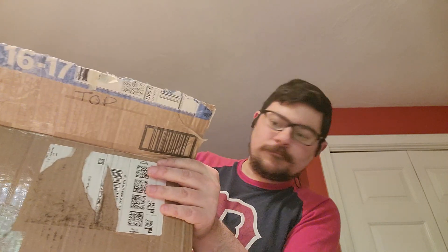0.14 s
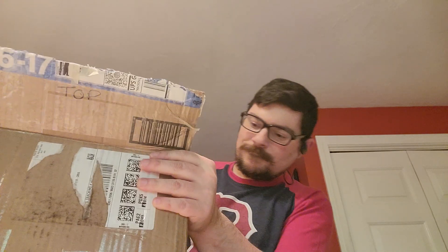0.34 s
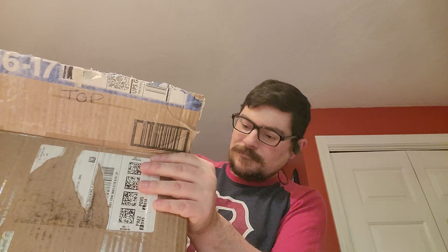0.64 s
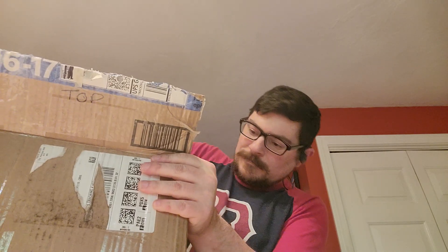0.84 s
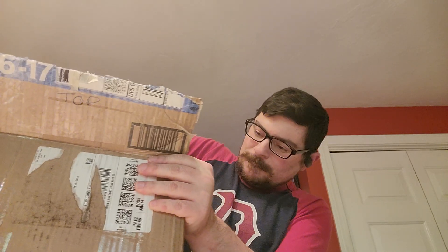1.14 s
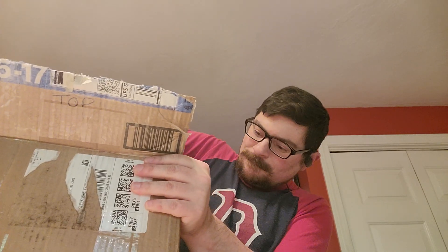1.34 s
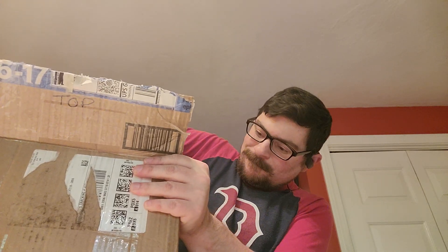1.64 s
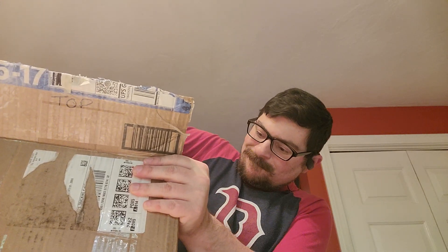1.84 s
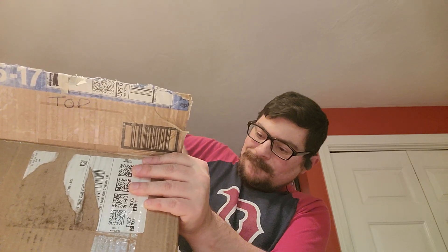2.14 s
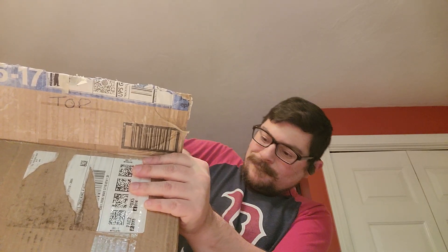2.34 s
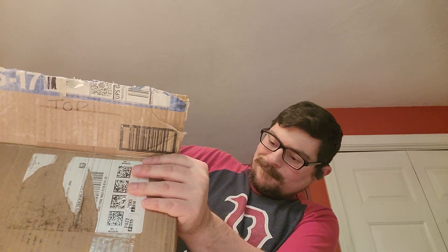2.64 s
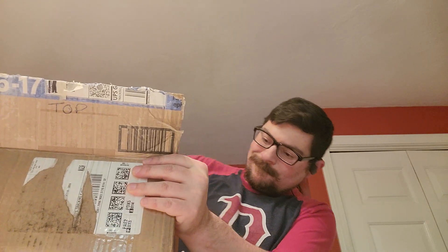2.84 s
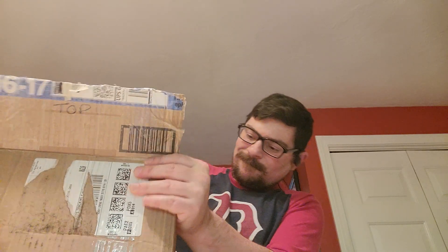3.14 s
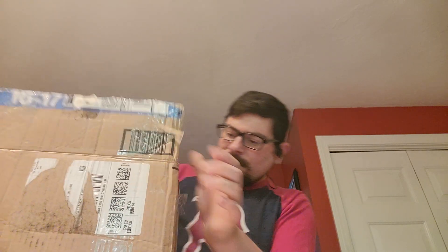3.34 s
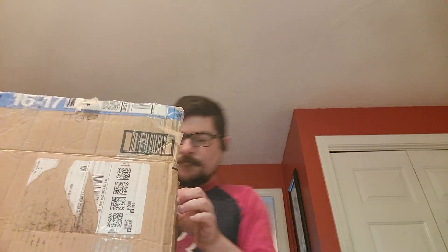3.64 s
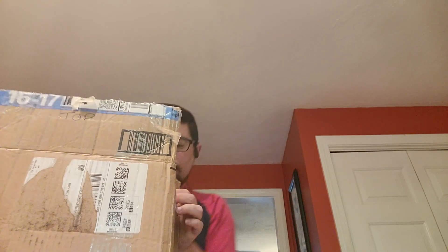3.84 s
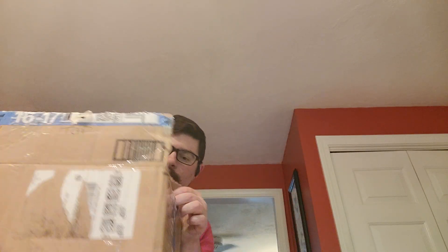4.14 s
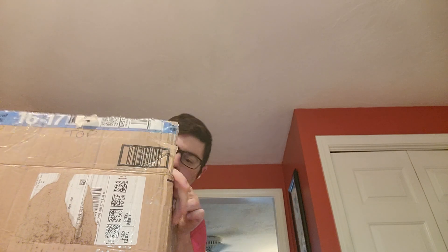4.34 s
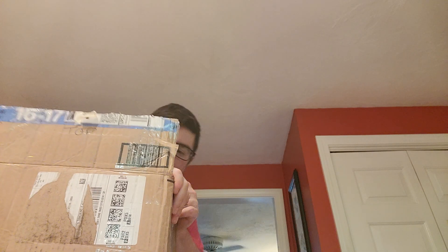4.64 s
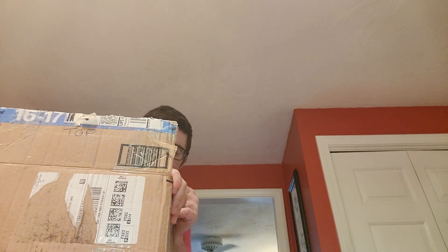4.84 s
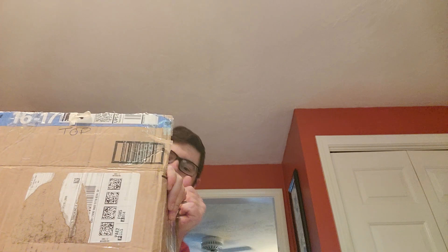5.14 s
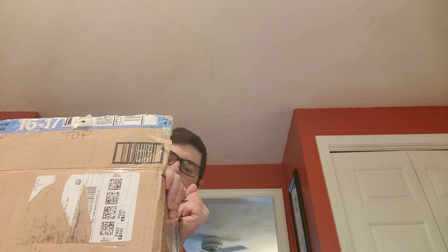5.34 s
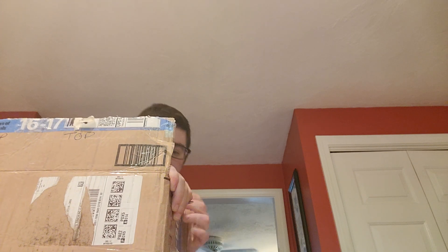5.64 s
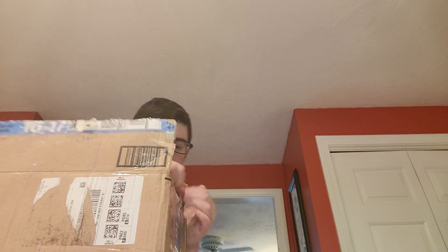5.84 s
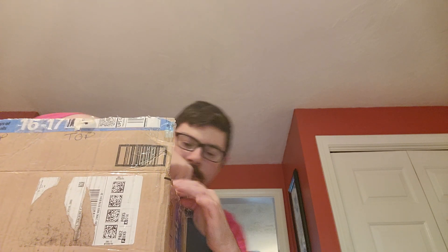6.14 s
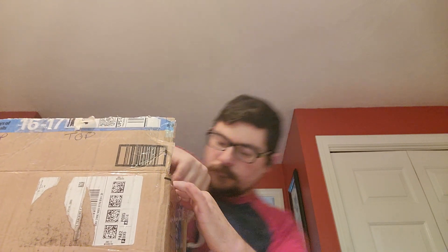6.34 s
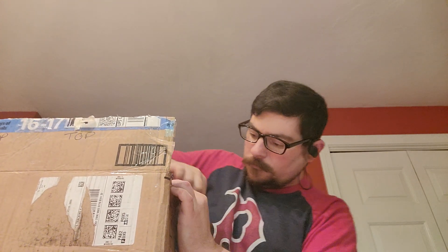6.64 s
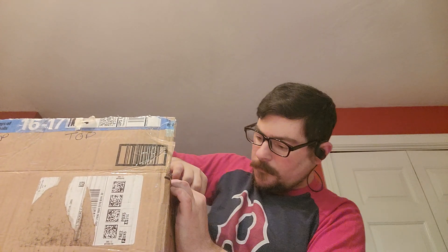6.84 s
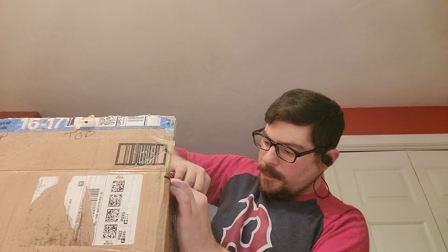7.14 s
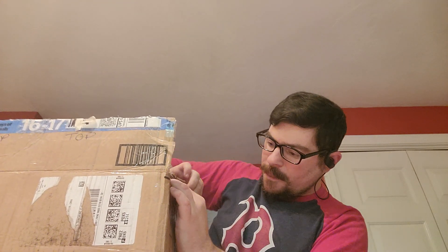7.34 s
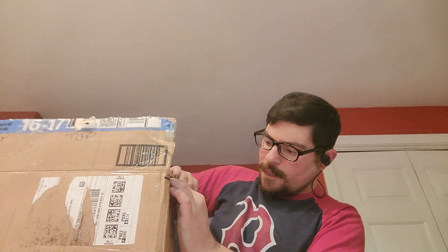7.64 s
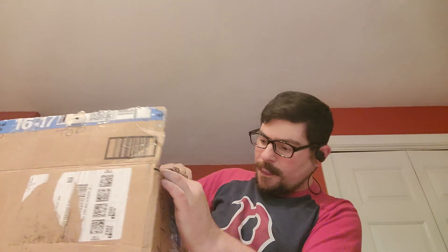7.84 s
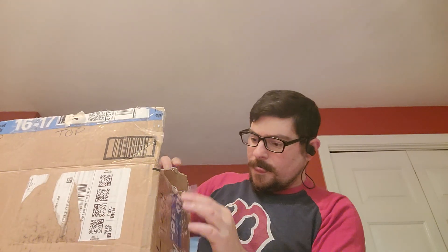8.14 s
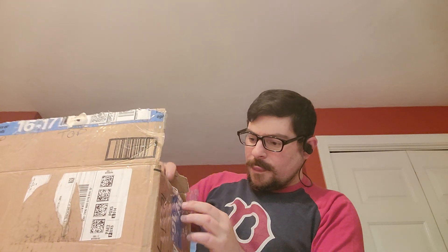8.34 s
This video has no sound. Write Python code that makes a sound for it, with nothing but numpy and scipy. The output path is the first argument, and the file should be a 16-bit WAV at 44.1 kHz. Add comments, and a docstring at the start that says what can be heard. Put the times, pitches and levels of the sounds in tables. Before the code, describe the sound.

Fingers rub and pick at a big hollow cardboard box in a small bare room, with juddering scrapes, crinkly tape snaps and a late sharp rip.

```python
"""Fingers pick and tear packing tape off a big cardboard box, close to a phone in a small, bare room.
Film snaps are short noise bursts, taut tape pings are sinking tones, and glue lets go in runs of grains.
Knocked or buckled panels are damped oscillators that excite the modes of the hollow box.
Between them hands rub the cardboard by stick-slip: filtered grains of noise under each stroke.
The walls answer all the handling with a bright, diffuse tail; indoor air rumbles faintly below."""
import sys
import numpy as np
from scipy import signal
from scipy.fft import rfft, irfft, next_fast_len
from scipy.io import wavfile
from scipy.ndimage import uniform_filter1d

SR = 44100
rng = np.random.default_rng(int(sys.argv[2]) if len(sys.argv) > 2 else 0)


def log_audio(samples):
    """Write samples as a 16-bit WAV file to the path given in sys.argv[1]."""
    # one column per channel
    frames = np.atleast_2d(samples).T
    # limit to full scale, then quantise
    limited = np.clip(frames, -1, 1)
    pcm = np.round(limited * 32767).astype(np.int16)
    wavfile.write(sys.argv[1], SR, pcm)


N = 374850
TIME = np.arange(N) / SR  # s
TOP_HZ = 15800  # upper edge of the phone's band


def undb(db):
    """Level: decibels to amplitude gain."""
    return 10 ** (np.asarray(db) / 20)


def unit(x):
    """Normalization: scale to rms 1."""
    return x / np.sqrt(np.mean(x ** 2) + 1e-18)


def along(points, hz, axis=1):
    """Interpolation: read a table column on a log-frequency axis."""
    points = np.array(points)
    return np.interp(np.log(hz + 1), np.log(points[:, 0]), points[:, axis])


def colour(x, points, tilt_db=0, size=2048):
    """Minimum-phase filtering: a causal response of unit energy with a given spectrum, tilted per octave."""
    hz = np.fft.rfftfreq(size, 1 / SR)
    level_db = along(points, hz) + tilt_db * np.log2(1 + hz / 1000)
    cepstrum = irfft(np.log(undb(level_db)))
    # Folding the cepstrum onto positive times makes the response causal.
    cepstrum[size // 2:] = 0
    cepstrum[1:] *= 2
    response = irfft(np.exp(rfft(cepstrum)))
    response = response[None] / np.linalg.norm(response)
    return signal.fftconvolve(x, response, axes=1)[:, :x.shape[1]]


def add(out, s, x):
    """Superposition: mix a sound in at time s."""
    i = max(int(s * SR), 0)
    out[:, i:i + x.shape[-1]] += x[..., :N - i]


def fade(t, t60):
    """Exponential damping: the amplitude falls 60 dB in t60 seconds."""
    return np.exp(-np.log(1000) * t / max(t60, 1e-4))


def ports(x, likeness):
    """Interaural coherence: two unrelated signals become a partly alike left and right."""
    c = np.clip(likeness, 0, 1)
    common = np.sqrt(1 + c) * x[0]
    opposed = np.sqrt(1 - c) * np.array([x[1], -x[1]])
    return (common + opposed) / np.sqrt(2)


def uneven_sizes(shape, spread_db):
    """Log-normal statistics: amplitudes scatter about 1 in decibels, clipped at two spreads."""
    return undb(spread_db * np.clip(rng.standard_normal(shape), -2, 2))


def grains(n, rate, spread_db, t60, likeness):
    """Shot noise: random tiny slips of uneven size, each a short puff of noise; rate is per second."""
    hits = (rng.random(n) < rate / SR) * uneven_sizes(n, spread_db)
    power = signal.lfilter([1], [1, -fade(1 / SR, t60) ** 2], hits ** 2)
    return unit(np.sqrt(power) * ports(rng.standard_normal((2, n)), likeness))


def indoor_air(level_db=-55.5):
    """Broadband ambient noise: steady noise concentrated in the bass."""
    # spectrum of the air rumble: frequency_hz, level_db
    air_spectrum = [(25, -3), (80, 0), (277, 1), (516, -8), (818, -34), (911, -20.5), (1290, -27.5),
                    (7510, -33), (16000, -55)]
    noise = ports(rng.standard_normal((2, N)), 0.86)
    return undb(level_db) * colour(noise, air_spectrum)


def strokes(swell_share=0.23, release_t60=0.45):
    """Friction follows sliding speed: each stroke gathers speed, holds it and dies away; powers add."""
    # hand strokes: start_s, length_s, panel_drag_db, paper_scrape_db, film_hiss_db
    stroke_rows = [(0, 0.072, -47.5, -58, -61), (0.046, 0.36, -44.5, -55, -50.5),
                   (0.484, 0.11, -55, -57.5, -60), (0.574, 0.09, -39.5, -48, -50.5),
                   (0.856, 0.24, -46, -56, -54), (1.067, 0.45, -43.5, -57.5, -55),
                   (1.486, 0.45, -58, -64, -54), (1.836, 0.32, -46.5, -53, -56),
                   (2.06, 0.22, -45, -59, -58), (2.393, 0.16, -49.5, -52, -49),
                   (2.543, 0.37, -42.5, -65, -64), (2.924, 0.17, -46, -65, -60),
                   (3.144, 0.15, -38, -50, -49.5), (3.533, 0.038, -45, -51.5, -51),
                   (3.615, 0.14, -42.5, -64, -57), (3.69, 0.16, -44.5, -52.5, -52),
                   (3.845, 0.19, -40, -48.5, -50.5), (4.065, 0.16, -43.5, -47.5, -43.5),
                   (4.262, 0.11, -44, -49.5, -47), (4.348, 0.15, -42.5, -50, -59),
                   (4.45, 0.29, -44, -50.5, -56), (4.755, 0.083, -57, -55, -45),
                   (4.896, 0.21, -48, -53.5, -54), (5.15, 0.21, -43, -50.5, -48),
                   (5.427, 0.14, -46, -54, -56), (5.565, 0.071, -40.5, -47, -45),
                   (5.645, 0.22, -42, -47.5, -49), (5.997, 0.041, -52, -58.5, -51.5),
                   (6.282, 0.2, -50.5, -59, -57), (6.594, 0.19, -50, -58.5, -54),
                   (7.09, 0.14, -54, -68.5, -61), (7.258, 0.11, -49.5, -58.5, -48),
                   (7.372, 0.065, -39, -58, -39), (7.602, 0.31, -44.5, -52.5, -47),
                   (7.984, 0.074, -48, -49.5, -55), (8.356, 0.027, -56.5, -70, -71),
                   (8.435, 0.065, -49, -52.5, -50.5)]
    # the hands holding the box never lie quite still: panel_drag_db, paper_scrape_db, film_hiss_db
    holding_db = (-53.5, -81.5, -70)
    power, t = np.zeros((3, N)), TIME[:SR]
    for s, length, *levels_db in stroke_rows:
        swell = np.minimum(t / (swell_share * length), 1)
        speed = swell * fade(np.maximum(t - length, 0), release_t60)
        add(power, s, np.outer(undb(levels_db), speed) ** 2)
    return np.sqrt(power + undb(holding_db)[:, None] ** 2)


def waver(per_s):
    """Slow random modulation: levels held briefly and smoothed, of rms 1."""
    k = int(SR / per_s)
    held = np.repeat(rng.standard_normal(N // 100), k)[:N]
    return unit(uniform_filter1d(held, k))


def crackles(rate=6, spread_db=9.5, cycles=6, order=12):
    """Impulse response: fibres and creases give way, each with a damped tick at one of twelve pitches."""
    out, t = np.zeros((2, N)), TIME[:SR // 50]
    for hz in np.geomspace(700, 5000, order):
        hits = (rng.random(N) < rate / SR) * uneven_sizes((2, N), spread_db)
        tick = np.sin(2 * np.pi * hz * t) * fade(t, cycles / hz)
        out += signal.oaconvolve(hits, tick[None], axes=1)[:, :N]
    return unit(out)


def rubbing(uneven_db=0.5):
    """Stick-slip friction: panels rumble, paper scrapes and crackles, loose film hisses, at an uneven pace."""
    # spectrum of the panels' rumble: frequency_hz, level_db
    drag_spectrum = [(25, -14.5), (50, 1.5), (75, 0), (130, -2), (300, -1), (530, -5), (800, -14),
                     (1600, -28.5), (5000, -53)]
    # spectrum of the scraped paper: frequency_hz, level_db
    scrape_spectrum = [(300, -16), (800, -1.5), (1400, -1), (2400, -7.5), (3500, -2.5), (5000, -13.5),
                       (9000, -32)]
    # spectrum of the loose film: frequency_hz, level_db
    hiss_spectrum = [(2500, -16), (5000, -8), (7300, -1.5), (9700, -8.5), (13000, -3.5), (16000, -3)]
    drag, scrape, hiss = strokes()
    pace = undb(uneven_db * waver(40))
    slips = grains(N, rate=300, spread_db=3.5, t60=0.068, likeness=1.0)
    fibres = grains(N, rate=760, spread_db=2.5, t60=0.0095, likeness=0.099)
    crinkle = grains(N, rate=660, spread_db=8.5, t60=0.0079, likeness=0.13)
    rumble = undb(-2.0) * drag * colour(slips, drag_spectrum)
    paper = 0.75 * colour(fibres, scrape_spectrum) + 0.85 * crackles()
    film = colour(crinkle, hiss_spectrum)
    return rumble + pace * (undb(-1.5) * scrape * paper + undb(-6.0) * hiss * film)


def peels(rise_s=0.00035, release_t60=0.011, fractures_per_s=350, fractures_at_db=-33):
    """Adhesive fracture: glue strands break in quick uneven runs and shake the stretched film."""
    # stretches of peeling tape: start_s, length_s, relative level_db, brightness_db_per_octave
    peel_rows = [(0.21, 0.044, -34.5, 4.5), (0.927, 0.037, -49, 7.5), (1.519, 0.03, -32, 5.5),
                 (1.631, 0.02, -36, 4), (2.733, 0.011, -31, -0.5), (3.305, 0.036, -41, 0),
                 (4.695, 0.017, -34.5, 0.5), (5.275, 0.03, -38, -4), (5.63, 0.029, -43, 2),
                 (7.405, 0.012, -32.5, -1), (7.497, 0.025, -31, 1.5), (7.522, 0.025, -28.5, 1.5),
                 (7.635, 0.018, -34.5, 4), (7.737, 0.038, -19, 4.5), (7.799, 0.099, -32, 1.5)]
    # spectrum of the stretched film: frequency_hz, level_db
    film_spectrum = [(150, 4), (400, 12.5), (800, 0.5), (1500, 1.5), (2500, -0.5), (4000, 2.5),
                     (7000, -2.5), (9700, -10.5), (12500, -10), (16000, -6.5)]
    out, t = np.zeros((2, N)), TIME[:SR // 4]
    for s, length, db, tilt_db in peel_rows:
        pull = (1 - np.exp(-t / rise_s)) * fade(np.maximum(t - length, 0), release_t60)
        # A harder pull breaks more strands per second.
        rate = fractures_per_s * undb(db - fractures_at_db)
        fractures = grains(len(t), rate=rate, spread_db=4.5, t60=0.003, likeness=0.3)
        add(out, s, undb(db + 1.0) * colour(fractures * pull, film_spectrum, tilt_db))
    return out


def snaps(t60=0.0056, rise_s=0.00043, snap_db=-1, pan_db=0.5):
    """Impulsive release: the film snaps or a nail slips off its edge in a short burst of noise."""
    # snaps: start_s, relative level_db, body_db (low and middle bands), top_db (treble)
    snap_rows = [(0.212, -15, -11, -9), (.378, -20, -0.5, -3), (0.64, -25.5, -9, -8), (.689, -30, 9, 10),
                 (0.9246, -23, -22, -3), (1.211, -30.5, -15, 3), (1.3286, -21, -11.5, -8),
                 (1.5207, -3, 8, 0), (1.5433, -14, -8, -2), (1.642, -10.5, -7, -2.5),
                 (1.8154, -15, -21, -4.5), (1.884, -15, -8.5, -5.5), (1.914, -17, -12, -3),
                 (1.9634, -11, -11, -10), (2.1321, -12.5, -7, -6.5), (2.669, -17.5, -6.5, -5),
                 (2.719, -20, -7, -7), (2.7333, -12.5, -4.5, 1.5), (2.739, -16, -7, 9),
                 (2.748, -14, -4, 14), (2.761, -18, -7, 2), (2.766, -8, -18, 17), (2.804, -13.5, -4, -3.5),
                 (2.8393, -8.5, -2, -2), (2.856, -14.5, -20, -5), (2.8768, -14.5, -17, -3),
                 (2.958, -15.5, -2.5, -10.5), (3.042, -14, -8, -3), (3.102, -15.5, -5, -0.5),
                 (3.105, -27, -9, 2), (3.2866, -19.5, 5, -1), (3.298, -17, -7, -8), (3.78, -33, 8, -15),
                 (3.859, -21, 7, -3), (4.054, -30, -2, -3), (4.221, -24, 11, -18), (4.428, -26, -4, -12),
                 (4.456, -25.5, -5, -8), (4.699, -23, 7, -14), (4.707, -29, 2, -34), (4.819, -25, -24, -7),
                 (4.9894, -22.5, -8, -17), (5.08, -37, 5, -10), (5.236, -25.5, -33, -30),
                 (5.26, -17.5, -26, -9), (5.275, -15, -18, -9.5), (5.574, -27, -3, -5),
                 (5.592, -23.5, -14, -10), (5.627, -15, -10.5, -3), (5.704, -23.5, -9, 4),
                 (5.854, -33, 8, -14), (6.346, -29.5, 6, -15), (6.4394, -29.5, -1, -7),
                 (6.64, -31.5, -3, -2), (6.9047, -34, 4, -20), (7.178, -27, -8, 1), (7.272, -31, -1, -9),
                 (7.306, -26.5, -8.5, -3), (7.362, -23, -4, -5), (7.389, -17.5, -13, -1),
                 (7.4, -14.5, -4, -7), (7.414, -14.5, -14, -6), (7.4292, -16, -15, -9),
                 (7.4745, -12.5, -8.5, -12), (7.488, -17, -10, -17), (7.503, -13.5, -12, -17),
                 (7.524, -11, -5, -4.5), (7.6408, -18, 1, -14), (7.662, -20, -7, 0), (7.7327, -21, -5, -3),
                 (7.737, -4.5, -12, -22), (7.7544, 0.5, -5, -13), (7.777, -3, -11, -1),
                 (7.79, -8.5, -10, -2), (8.068, -21, -1.5, -10), (8.156, -33.5, -15, -8)]
    out, t = np.zeros((2, N)), TIME[:SR // 5]
    side_db = np.array([[pan_db], [-pan_db]]) / 2  # pan_db is left minus right
    for s, db, body_db, top_db in snap_rows:
        noise = ports(rng.standard_normal((2, len(t))), 0.79)
        crack = noise * fade(t, t60) * (1 - np.exp(-t / rise_s))
        body = [(300, body_db), (1200, body_db + 10.0), (2500, body_db + 8)]
        treble = [(4000, -3.5), (7000, -1.5), (9700, top_db), (13000, top_db + 2.5)]
        add(out, s, colour(crack, body + treble) * undb(db + snap_db + side_db))
    return out


def knocks(push_s=0.0017, crunch_t60=0.026, rattle_db=-7, push_cycles=0.75, box_hz=260):
    """Damped oscillation: a panel swings, its flutes crunch, and the box rings, most after low knocks."""
    # bumps and buckles: start_s, relative level_db, pitch_hz, ring_cycles, relative crunch_db
    knock_rows = [(0.214, -12, 273, 3.9, -4), (.220, -24, 81, 6.6, -7), (.229, -21, 480, 8.6, 4),
                  (0.379, -24, 333, 3.1, 3), (.455, -30.5, 264, 5.3, -5), (0.69, -30, 200, 1, 5),
                  (.883, -28.5, 364, 2.9, -6), (1.521, -11.5, 360, 7, 6.5), (1.5209, -14, 1030, 3.5, -9),
                  (1.640, -25, 362, 4.4, -31), (1.808, -25, 295, 5, -0.5), (1.876, -20, 290, 3.2, -1.5),
                  (1.948, -24, 193, 4, -1.5), (2.133, -32, 305, 4.9, -9), (2.417, -21, 208, 1.8, -10),
                  (2.565, -17, 140, 4.3, -5), (2.607, -20, 270, 2.4, -17), (2.736, -19.5, 406, 3.6, -6.5),
                  (2.749, -28.5, 300, 11, -3), (2.839, -22, 346, 3.2, 7.5), (2.957, -18, 1200, 7.2, 0.5),
                  (2.957, -18, 540, 7.7, -13), (3.289, -18, 302, 1.7, 1), (3.860, -11.5, 540, 13, -10),
                  (3.897, -27.5, 534, 14, 2), (3.927, -31, 530, 15, -4), (4.05, -25.5, 483, 7.2, -13),
                  (4.356, -28.5, 259, 4.2, -28), (4.388, -26, 143, 4, 3.5), (4.701, -19.5, 538, 12, -3),
                  (4.705, -23, 290, 6.9, 7.5), (5.905, -23, 146, 1.3, -7), (6.351, -36.5, 168, 7.8, 4.5),
                  (6.815, -37, 650, 2.5, 2), (6.904, -33, 352, 2.7, -1), (7.745, -21, 268, 6.8, 4),
                  (7.768, -21.5, 234, 3.6, 10), (7.785, -20.5, 271, 7.5, 10), (8.068, -26, 297, 1.6, -1)]
    # spectrum of the crunching flutes: frequency_hz, level_db
    crunch_spectrum = [(80, -31.5), (300, 14.5), (700, 9), (1200, 5), (1800, -10.5), (3500, -2.5),
                       (9000, -65)]
    # modes of the hollow box: frequency_hz, t60_s, relative level_db
    box_modes = [(80.3, 0.19, -31.5), (178, 0.15, -13.5), (233, 0.26, -28), (290, 0.23, -15.5),
                 (391, 0.16, -17), (522, 0.29, -25), (686, 0.3, -27), (757, 0.41, -28.5),
                 (931, 0.14, -29.5), (1100, 0.1, -32), (1370, 0.083, -34)]
    out, t = np.zeros((2, N)), TIME[:SR // 4]
    box = sum(undb(db) * fade(t, t60) * np.sin(2 * np.pi * hz * t) for hz, t60, db in box_modes)
    for s, db, hz, cycles, crunch_db in knock_rows + judder():
        onset = 1 - np.exp(-t / min(push_s, push_cycles / hz))
        swing = 2.67 * np.sin(2 * np.pi * hz * t) * fade(t, cycles / hz) * onset
        noise = ports(rng.standard_normal((2, len(t))), 0.58)
        crunch = undb(crunch_db + rattle_db) * colour(noise * fade(t, crunch_t60), crunch_spectrum)
        ringing = 0.77 * min(box_hz / hz, 1) * box
        add(out, s, undb(db) * (swing + crunch + ringing))
    return out


def judder(slip_hz=243, cycles=4.3, crunch_db=-8.5):
    """Stick-slip: a finger dragged hard over a panel gives slips, ticks and rebounds, listed as knocks."""
    # slips of the finger: start_s, relative level_db
    slip_rows = [(1.057, -27.5), (1.1, -31), (1.123, -20.5), (1.162, -23.5), (1.187, -22.5), (1.216, -21),
                 (1.243, -18), (1.292, -15.5), (1.325, -17), (1.36, -16), (1.399, -23), (1.451, -20),
                 (1.475, -33)]
    # the finger catches once more, weaker and higher: nominal wait_s, relative level_db, nominal pitch_hz
    rebound = (0.013, -10, 500)
    # the dry tick of the paper skin: relative level_db, nominal pitch_hz, ring_cycles
    slip_tick = (-28.5, 870, 3.34)
    wait_s, rebound_db, rebound_hz = rebound
    tick_db, tick_hz, tick_cycles = slip_tick
    scatter = rng.uniform(0.7, 1.3, (len(slip_rows), 3))
    rows = []
    for (s, db), (late, sharp, bright) in zip(slip_rows, scatter):
        rows += [(s, db, slip_hz, cycles, crunch_db),
                 (s, tick_db, tick_hz * bright, tick_cycles, crunch_db),
                 (s + wait_s * late, db + rebound_db, rebound_hz * sharp, cycles, crunch_db)]
    return rows


def scuffs(attack_s=0.0038, release_t60=0.043):
    """Resonance: a fingertip scuffs an edge, and its run of catches rings the hollow flutes."""
    # scuffs: start_s, length_s, relative level_db, pitch_hz
    scuff_rows = [(3.721, 0.036, -43.5, 1520), (4.393, 0.049, -50.5, 1720), (4.498, 0.05, -48.5, 1980),
                  (8.01, 0.088, -50.5, 1820)]
    # resonance of the flutes: multiple_of_pitch, level_db
    flute_resonance = [(.2, -23), (.5, -0.5), (.7, -14), (1, -6), (1.3, -22.5), (4, -34)]
    out, t = np.zeros((2, N)), TIME[:SR // 4]
    for s, length, db, hz in scuff_rows:
        press = np.minimum(t / attack_s, 1) * fade(np.maximum(t - length, 0), release_t60)
        catches = grains(len(t), rate=220, spread_db=1.0, t60=0.0082, likeness=0.84)
        spectrum = [(k * hz, gain_db) for k, gain_db in flute_resonance]
        add(out, s, undb(db) * colour(catches * press, spectrum))
    return out


def pings(width_hz=170, sag=0.071, sag_s=0.06):
    """Tension sets pitch: taut tape gives a rough ping that sinks by up to the share sag as it slackens."""
    # pings: start_s, level_db, initial pitch_hz, t60_s
    ping_rows = [(4.054, -35, 1710, .012), (4.457, -26.5, 2080, 0.0085), (4.622, -33, 2620, 0.012),
                 (4.990, -23, 3430, .005), (4.996, -27, 4000, 0.0067), (6.567, -34, 1100, 0.017),
                 (6.752, -35, 2120, 0.017), (6.765, -64, 2230, 0.2), (6.815, -35, 1510, 0.005),
                 (7.017, -39, 1240, 0.0041)]
    out, t = np.zeros((2, N)), TIME[:SR // 5]
    slack = t - sag * (t - sag_s * (1 - np.exp(-t / sag_s)))
    for s, db, hz, t60 in ping_rows:
        # A random walk of the phase roughens the tone.
        flutter = np.cumsum(rng.standard_normal(len(t))) * np.sqrt(2 * np.pi * width_hz / SR)
        add(out, s, undb(db) * np.sin(2 * np.pi * hz * slack + flutter) * fade(t, t60))
    return out


def echoes(gap_s=0.002, build_s=0.001, order=16):
    """Diffuse reverberation: the walls answer one spot with decaying noise, most alike at the ears in the bass."""
    # the room: frequency_hz, t60_s, level_db against the direct sound, left_right_likeness (0-1)
    room_bands = [(108, 0.09, -3, 1), (302, 0.21, -10, 0.92), (670, 0.43, -2, 0.35),
                  (1440, 0.26, 0.5, 0.07), (3530, 0.34, 4.5, 0.35), (8900, 0.31, 5, 0), (15200, 0.24, 8, 0)]
    t = TIME[:SR * 2 // 3]
    octave = np.log2(np.fft.rfftfreq(len(t), 1 / SR) + 1)
    centres = np.geomspace(60, TOP_HZ, order)
    noise = rfft(rng.standard_normal((2, len(t))))
    build = 1 - np.exp(-np.maximum(t - gap_s, 0) / build_s)
    tail = 0
    for hz, own in zip(centres, np.eye(order)):
        t60, wet_db, likeness = (along(room_bands, hz, axis=k + 1) for k in range(3))
        # Overlapping triangular bands sum to the full spectrum.
        band = irfft(noise * np.interp(octave, np.log2(centres), own), len(t))
        shape = fade(t, t60) * build
        tail = tail + undb(wet_db) * ports(band, likeness) * shape / np.linalg.norm(shape)
    return tail


def room(x, wall_s=0.006, wall_db=-7, shifts_per_s=7):
    """Direct sound and reflections: direct sound leans by band, a near wall returns treble, the tail shifts."""
    # lean of the direct sound: frequency_hz, left_minus_right_db
    lean_bands = [(60, -1), (300, -5.5), (700, -4.5), (2000, -6.5), (6000, 8), (14000, 6.5)]
    size = next_fast_len(N + SR)
    lean_db = along(lean_bands, np.fft.rfftfreq(size, 1 / SR))
    heard = rfft(x, size) * undb(np.array([lean_db, -lean_db]) / 2)
    # As the sounding spot moves, the sound is shared in turn between two diffuse answers.
    turn = 2 * np.pi * shifts_per_s * TIME
    for share in (np.cos(turn), np.sin(turn)):
        heard += rfft(x * share, size) * rfft(echoes(), size)
    out = irfft(heard, size)[:, :N]
    add(out, wall_s, undb(wall_db) * np.diff(x))
    return out


def scene():
    """Superposition: panels and glue share one set of echoes, film and hands another, over indoor air."""
    panels_and_glue = room(knocks() + peels())
    film_and_hands = room(snaps() + pings() + rubbing() + scuffs())
    return panels_and_glue + film_and_hands + indoor_air()


def record(dry):
    """Band limiting and saturation: the phone drops the deepest bass, rounds tall peaks and cuts the top."""
    high_pass = signal.butter(2, 47, "high", fs=SR, output="sos")
    low_pass = signal.ellip(10, 0.2, 70, TOP_HZ, fs=SR, output="sos")
    dry = signal.sosfilt(high_pass, dry)
    dry = 0.85 * np.tanh(dry / 0.85)
    return signal.sosfilt(low_pass, dry)


dry = scene()
out = record(dry)
log_audio(out)
```